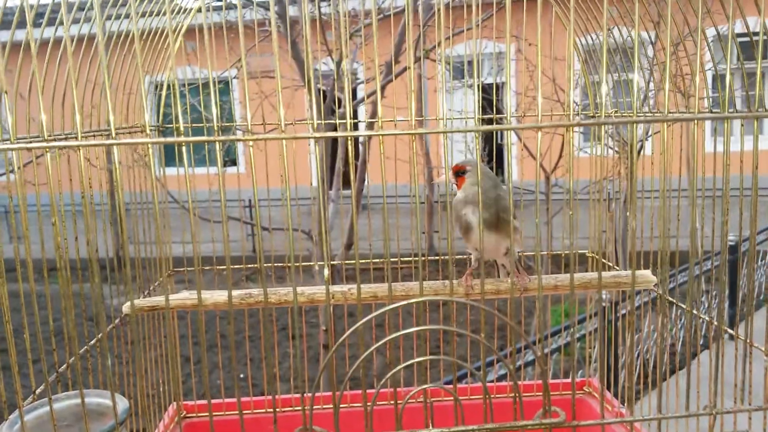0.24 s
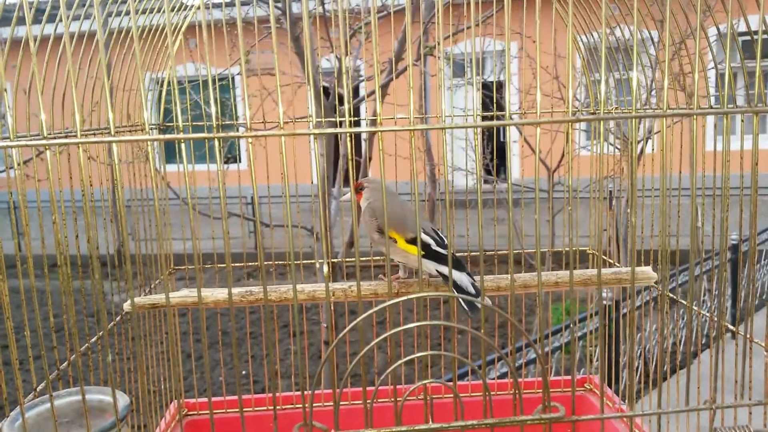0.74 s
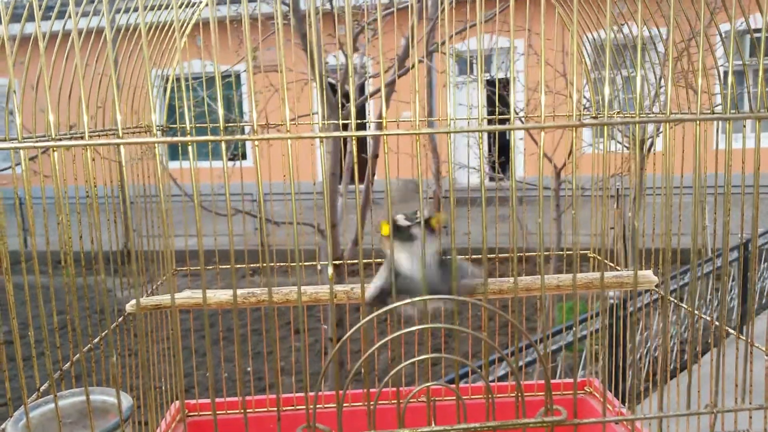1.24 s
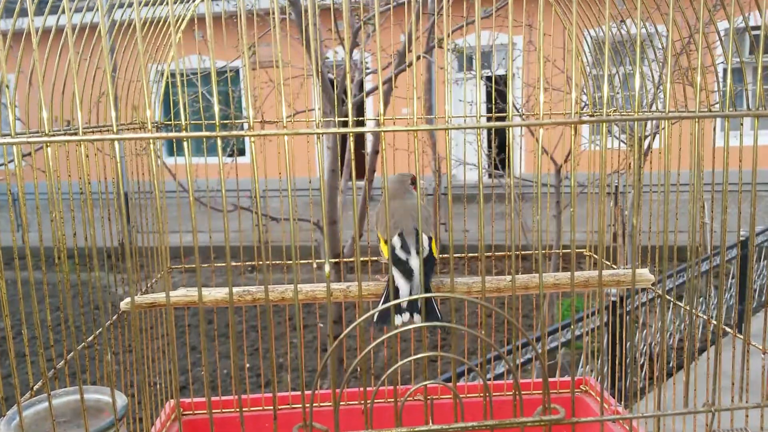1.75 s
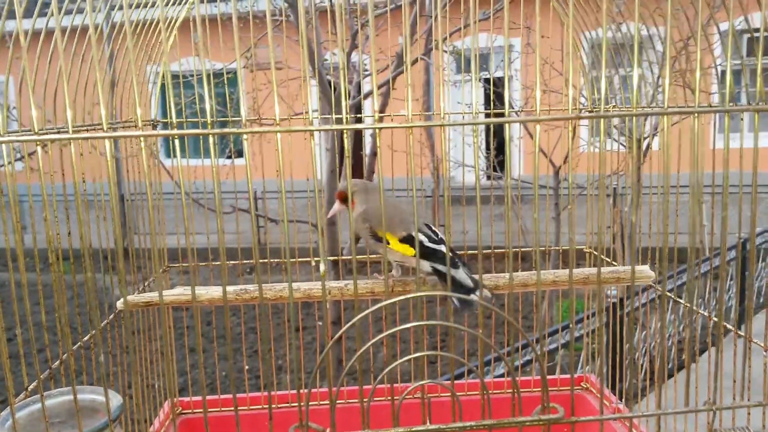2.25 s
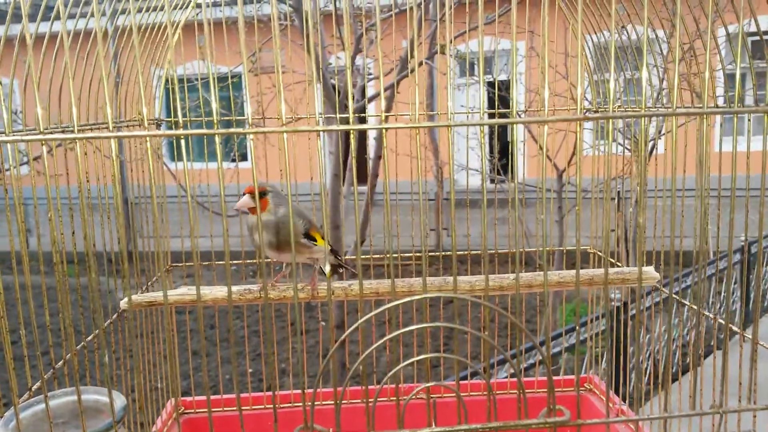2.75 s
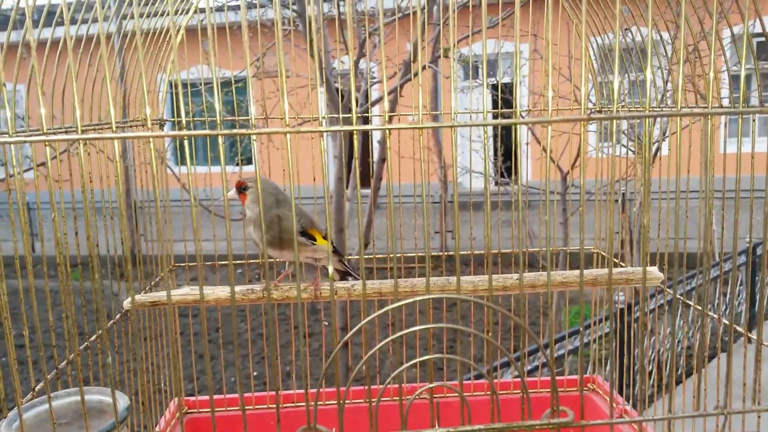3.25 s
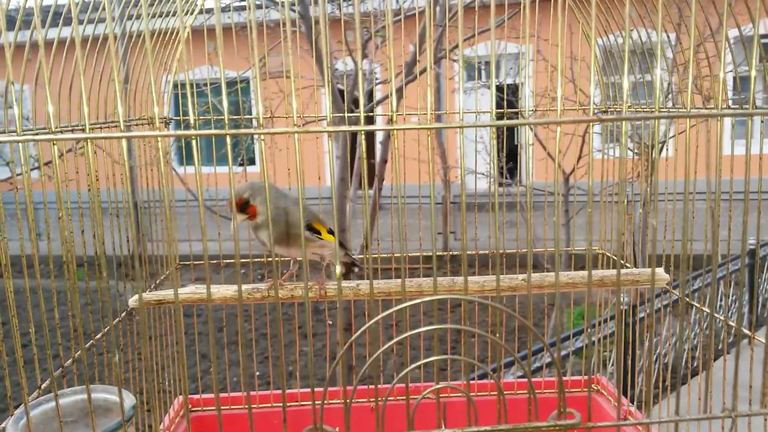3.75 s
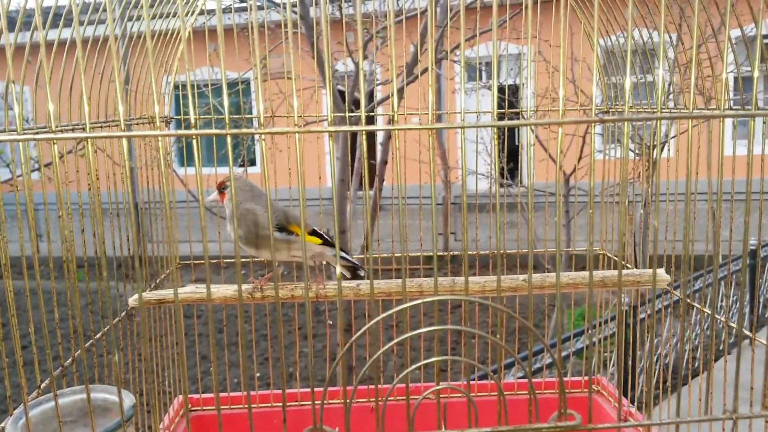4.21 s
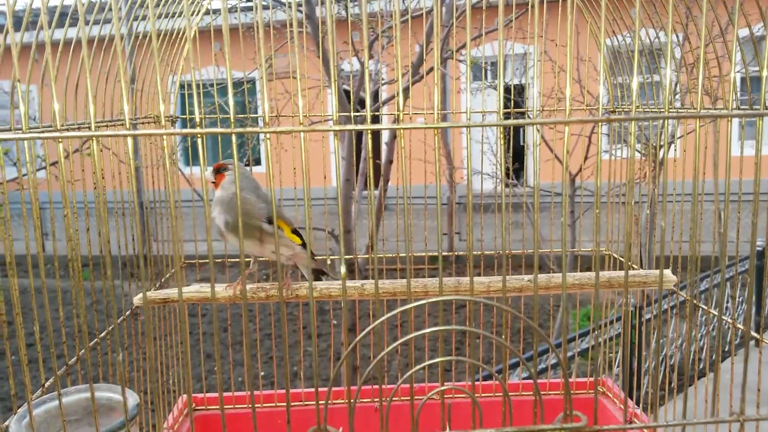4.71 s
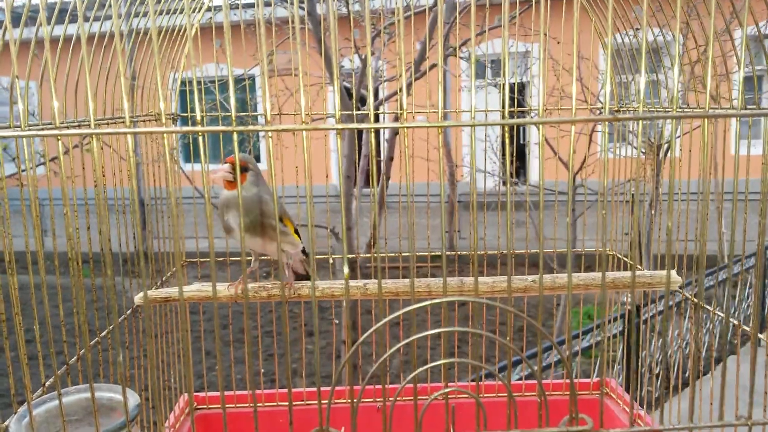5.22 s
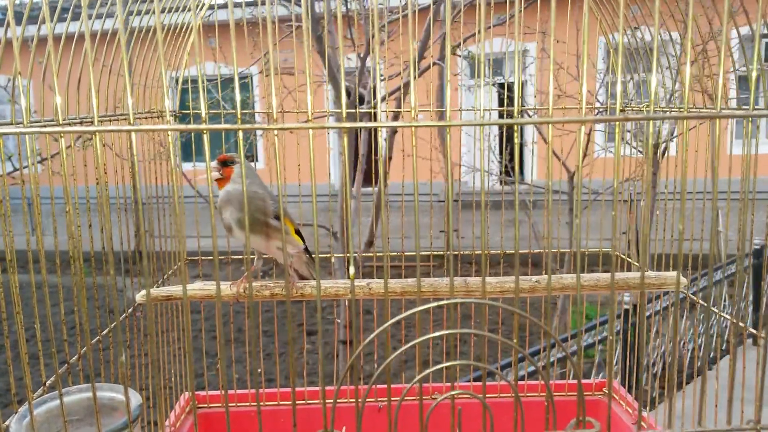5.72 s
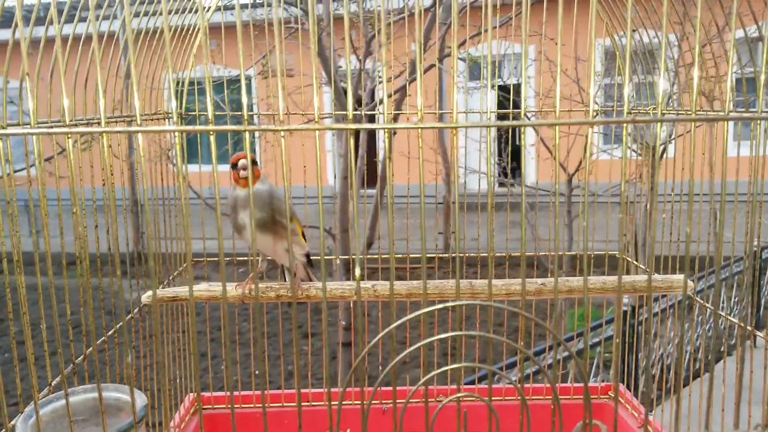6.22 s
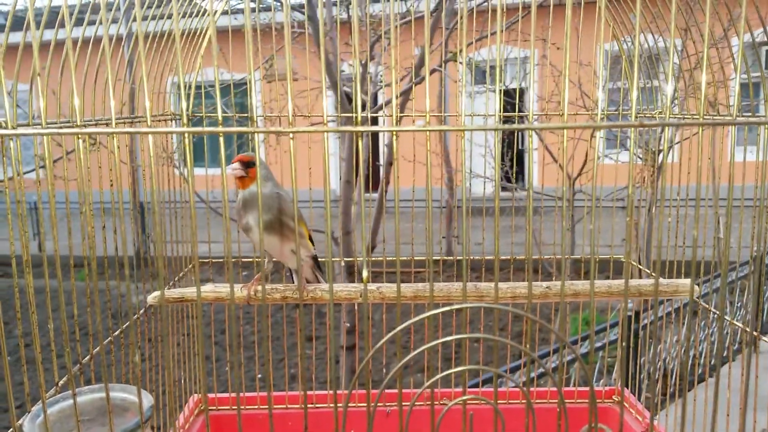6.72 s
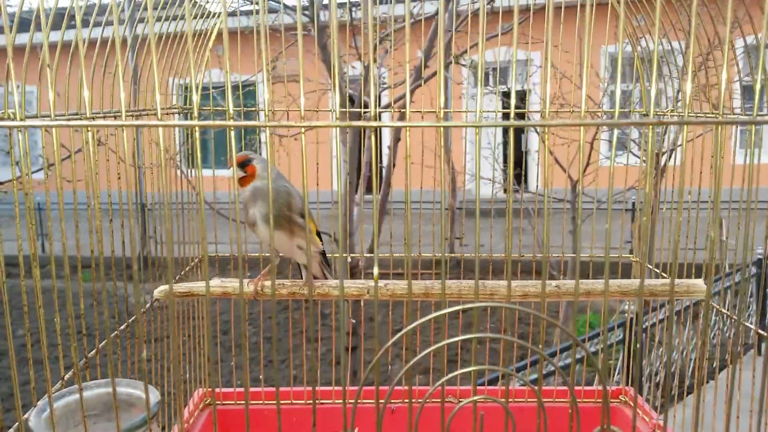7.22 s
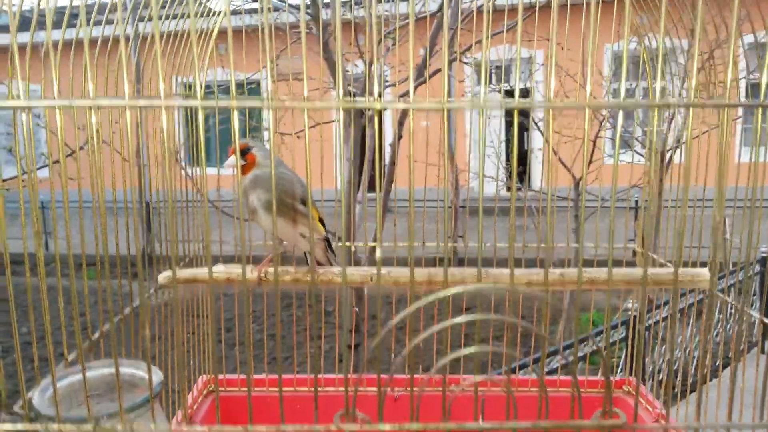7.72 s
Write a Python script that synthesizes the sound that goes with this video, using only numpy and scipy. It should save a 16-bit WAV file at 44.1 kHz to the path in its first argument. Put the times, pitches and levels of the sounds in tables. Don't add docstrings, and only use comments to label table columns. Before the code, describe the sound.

A courtyard outdoors, heard by a close stereo microphone with gentle low wind. At 0-0.9 s wings rustle, a far bird trills, faint knocks sound near 0.2 and 0.6, and brief distant chirps cluster around 0.7-0.8. At 1.25 the near finch starts with a tiny rasp, holds a high whistle near 6 kHz, slides down to 4 kHz by 1.7, then chatters in two quick groups of four, 1.84-2.05. Quiet follows, with faint far trills and soft rustling from 2.1 to 3. Wind bumps at 3.2-3.45; sharp hollow knocks at 3.6 open a hissing spray, steady until 4.5, fading out by 5.6. A soft bump comes at 4.6. From 4.95 to 6.8 the finch sings its busier phrase: clicks, chirps, a strong rise at 5.3, scrape, steep drop, warble, high swell, rolled fall and closing buzz. Then a subdued murmur, wind thumps near 7 and 7.5, and faint taps to about 7.9.

```python
import sys
import numpy as np
from scipy import signal
from scipy.fft import rfft, irfft, next_fast_len
from scipy.io import wavfile
from scipy.ndimage import uniform_filter1d, map_coordinates

SR = 44100
rng = np.random.default_rng(int(sys.argv[2]) if len(sys.argv) > 2 else 0)


def amp(db):
    return 10 ** (np.asarray(db, float) / 20)


def write(x):
    x = np.atleast_2d(x).T
    wavfile.write(sys.argv[1], SR, np.round(np.clip(x, -1, 1) * 32767).astype(np.int16))


N = 351036
TURN = round(3.3 * SR)
NOW = np.arange(N) / SR

# (time [s], pitch [Hz], level [dB])
RASP = [(1.248, 2950, -44.5), (1.26, 3150, -34.5), (1.286, 3547, -33), (1.305, 3600, -34.5),
        (1.32, 3820, -28), (1.328, 4020, -29), (1.336, 4400, -24)]
# (time [s], pitch [Hz], level [dB])
ARCH = [(1.335, 4340, -23), (1.345, 4619, -19.5), (1.357, 5360, -17), (1.38, 5810, -13), (1.4, 6010, -17.5),
        (1.486, 6197, -19), (1.51, 5980, -21)]
# (time [s], pitch [Hz], level [dB])
SLIDE = [(1.508, 5940, -22.5), (1.519, 5820, -12), (1.524, 5730, -8), (1.534, 5450, -16),
         (1.547, 5200, -11), (1.559, 5040, -22.5)]
SLIDE_END = [(1.558, 4950, -17), (1.572, 4980, -15.5), (1.578, 4870, -12.5), (1.585, 4860, -15.5),
             (1.592, 4800, -10.5), (1.611, 4645, -12.5), (1.627, 4450, -20), (1.665, 4175, -21.5),
             (1.687, 4100, -16)]
SLIDE_OUT = [(1.688, 4060, -15), (1.697, 3984, -20.5), (1.733, 3700, -31)]
# (time [s], level [dB])
CHATTER = [(1.837, -17), (1.856, -15), (1.875, -17.5), (1.892, -18.5), (1.972, -20.5), (1.991, -15),
           (2.01, -14.5), (2.029, -18)]
# (time [s], pitch [Hz], level [dB])
OPENER = [(4.95, 2593, -34.5), (4.955, 2770, -26.5), (4.963, 3031, -19.5), (4.969, 3046, -24),
          (4.978, 3095, -38.5)]
# (time [s], pitch [Hz], level [dB])
RISE = [(5.307, 2698, -58.5), (5.323, 3450, -23.5), (5.345, 4150, -13), (5.383, 4520, -18.5),
        (5.408, 4730, -20.5), (5.44, 5054, -0.5), (5.458, 5265, -16), (5.507, 5586, -9.5),
        (5.557, 5893, -12), (5.564, 5980, -27)]
# (time [s], pitch [Hz], level [dB])
SCRAPE = [(5.597, 4330, -36.5), (5.615, 5366, -17), (5.63, 5750, -37.5)]
# (time [s], pitch [Hz], level [dB])
DROP = [(5.653, 10010, -36), (5.662, 8910, -26), (5.678, 7990, -24.5), (5.692, 7590, -6.5),
        (5.7, 7340, -14), (5.716, 7150, -4), (5.725, 6770, -15.5), (5.746, 6590, -10.5),
        (5.753, 6740, -20.5)]
# (time [s], pitch [Hz], level [dB])
WARBLE = [(5.928, 3230, -47.5), (5.938, 4120, -12.5), (5.969, 3774, -21.5), (5.983, 3570, -22.5)]
FADE = [(5.981, 3560, -24), (6.013, 2985, -33), (6.034, 2650, -41), (6.055, 2399, -66)]
# (time [s], pitch [Hz], level [dB])
SWELL = [(6.296, 6950, -42.5), (6.31, 7480, -26), (6.347, 7370, -12), (6.372, 7347, -11.5),
         (6.377, 7330, -27.5)]
# (time [s], pitch [Hz], level [dB])
ROLL = [(6.459, 9640, -37.5), (6.484, 8286, -20), (6.513, 7450, -8), (6.542, 6960, -14), (6.563, 5834, -11)]
ROLL_END = [(6.561, 5750, -10), (6.568, 5620, -11.5), (6.578, 5345, -23.5)]
# (time [s], pitch [Hz], level [dB])
SPLUTTER = [(6.58, 5950, -19.5), (6.588, 4390, -22), (6.594, 3530, -36.5), (6.604, 2797, -52)]
# (time [s], pitch [Hz], level [dB])
BUZZ = [(6.6645, 4050, -30), (6.674, 4000, -16), (6.72, 3880, -19), (6.764, 3720, -23), (6.799, 3520, -28),
        (6.814, 3350, -40)]
# (time [s], pitch [Hz], level [dB])
HOOKS = [
    [(5.155, 8270, -36), (5.16, 8050, -16.5), (5.168, 7900, -11), (5.176, 8100, -23.5), (5.183, 8330, -31)],
    [(5.791, 4366, -31.5), (5.796, 5050, -15), (5.803, 5486, -14), (5.81, 5563, -12), (5.818, 5510, -14),
     (5.826, 5300, -34.5)],
    [(5.841, 4660, -33), (5.845, 5200, -22), (5.849, 5694, -21.5), (5.854, 5413, -30.5)],
    [(5.856, 3344, -36), (5.861, 4397, -16), (5.868, 3870, -21), (5.876, 3440, -31.5)],
    [(6.166, 8220, -39), (6.171, 7960, -28.5), (6.177, 7500, -15.5), (6.189, 7010, -10), (6.201, 6776, -15),
     (6.211, 6765, -17.5), (6.216, 6730, -42.5)],
]
# (time [s], pitch [Hz], level [dB])
TWISTS = [
    [(5.89, 7100, -28), (5.894, 5250, -13), (5.897, 4645, -22.5), (5.9, 5567, -15), (5.904, 6426, -19),
     (5.909, 6640, -30.5)],
    [(6.648, 4374, -31), (6.655, 4620, -16.5), (6.66, 5190, -16), (6.6635, 4685, -28)],
]
# (time [s], length [s], from [Hz], to [Hz], level [dB])
CHIRPS = [(5.035, 0.018, 3070, 4810, -10.5), (5.057, 0.014, 4706, 4875, -6.5),
          (5.208, 0.013, 3710, 4386, -20), (5.223, 0.028, 3556, 5673, -10), (5.248, 0.02, 5815, 5838, -9),
          (6.637, 0.0057, 7610, 7730, -22)]
# (time [s], length [s], from [Hz], to [Hz], level [dB])
FLICKS = [(5.644, 0.0058, 3886, 7834, -8), (5.649, .004, 7930, 9890, -24.5),
          (6.624, .007, 7777, 4395, -14.5), (6.631, 0.0066, 4480, 7640, -11.5)]

# (time [s], pitch [Hz], level [dB])
LOW_RASP = [(1.248, 2607, -41), (1.262, 2840, -48.5), (1.281, 3100, -52), (1.298, 3350, -47),
            (1.316, 3600, -36), (1.326, 3620, -39.5), (1.337, 4010, -32)]
# (time [s], pitch [Hz], level [dB])
LOW_ARCH = [(1.335, 3850, -22), (1.379, 4570, -25), (1.488, 4806, -24.5), (1.512, 4752, -39)]
# (time [s], pitch [Hz], level [dB])
LOW_RISE = [(6.238, 3430, -35.5), (6.252, 3700, -22.5), (6.275, 4053, -30), (6.301, 4526, -11),
            (6.331, 4760, -24.5), (6.374, 4890, -27), (6.38, 4990, -45)]
# (time [s], pitch [Hz], level [dB])
LOW_HOOKS = [
    [(5.155, 6800, -28.5), (5.16, 6300, -21), (5.168, 6100, -27), (5.177, 6150, -20), (5.183, 6250, -30.5)],
    [(5.838, 2282, -53.5), (5.846, 2870, -49.5), (5.856, 2705, -43.5)],
    [(5.915, 6100, -27), (5.918, 5050, -21.5), (5.925, 5050, -17.5), (5.932, 5246, -25.5),
     (5.939, 5115, -35)],
    [(6.01, 6110, -44.5), (6.018, 5825, -34.5), (6.028, 5440, -43), (6.036, 5143, -46.5)],
]
# (time [s], pitch [Hz], level [dB])
LOW_TWISTS = [
    [(5.305, 3258, -50), (5.32, 3500, -30), (5.335, 3800, -27.5), (5.347, 4024, -48)],
    [(5.894, 5590, -32), (5.899, 4536, -23.5), (5.904, 5340, -28), (5.913, 4880, -41)],
]
# (time [s], length [s], from [Hz], to [Hz], level [dB])
LOW_SLURS = [(5.6, .036, 3187, 4400, -28.5), (6.167, 0.049, 6100, 4825, -26.5)]
# (time [s], length [s], from [Hz], to [Hz], level [dB])
LOW_FLICKS = [(6.577, 0.006, 4730, 3050, -24), (6.588, 0.0065, 3830, 2370, -61)]

MIXED = [(1, 1), (2, -1), (1, -1), (-1, 2), (1, 2)]
# (frequency [Hz], width [Hz], share [0-1])
HOLLOWS = [(5050, 150, 0.53), (7100, 77, 0.49)]
# (frequency [Hz], left over right [dB], left lead [rad])
AWAY = [(3450, 0.7, 2.4), (4130, 4.1, 1.0), (4820, 5.1, -0.2), (5510, 12.1, -0.7), (6200, 12.3, -3.9),
        (6890, 0.1, -3.7), (7580, -4.6, -7.0), (11370, 1.4, -13.0), (14300, -9, -14.9)]
# (frequency [Hz], left over right [dB], left lead [rad])
FACING = [(3450, -1.0, -8.2), (4130, 3.3, -9.3), (4820, 2.1, -10.0), (6200, 6.4, -11.9),
          (6890, -1.8, -13.0), (7580, -6.2, -13.2), (8270, -9.8, -13.6), (9400, -1, -13),
          (11370, -1.2, -16.0), (14300, -8, -18.6)]
# (frequency [Hz], gain [dB])
RETURN = [(2000, -23.5), (3000, -6.5), (4000, -11), (5200, -8), (6700, -4), (8200, -4.5), (11000, -8)]
# (frequency [Hz], time to fall 60 dB [s])
WALLS = [(300, 0.11), (4000, 0.73), (7000, 0.58), (12000, 0.011)]

# (start [s], end [s], from [Hz], to [Hz], level [dB])
FAR = [(0.694, 0.701, 3850, 5840, -26), (0.7, 0.714, 5970, 5570, -26.5), (0.718, 0.721, 5700, 3870, -46.5),
       (0.722, 0.753, 2856, 3130, -40.5), (0.761, 0.766, 3380, 4400, -30.5),
       (0.765, 0.778, 4600, 3590, -31), (0.736, .757, 5730, 6300, -40), (0.772, 0.783, 7870, 7000, -42),
       (.782, 0.793, 7100, 7840, -45), (0.806, 0.821, 7870, 7300, -46.5), (.782, 0.794, 3710, 3900, -42.5),
       (0.807, 0.817, 3760, 3650, -33), (0.833, 0.867, 3600, 3880, -57), (1.175, 1.26, 4430, 3960, -49),
       (2.195, 2.215, 4050, 3920, -51.5), (2.305, 2.325, 3800, 3930, -50), (3.046, 3.056, 2490, 3620, -47),
       (3.097, 3.099, 2490, 3840, -40), (3.338, 3.417, 3010, 3090, -55.5),
       (4.626, 4.658, 2885, 4120, -35.5), (0.576, 0.585, 1900, 1950, -40.5), (0.962, 0.982, 740, 744, -36),
       (7.383, 7.401, 6450, 3390, -53), (7.612, 7.65, 3000, 3530, -59), (7.659, 7.686, 3690, 3390, -58),
       (7.701, 7.748, 2220, 2130, -63.5)]
# (start [s], end [s], pitch [Hz], rate [notes/s], level [dB])
FAR_TRILLS = [(0.049, .12, 3450, 29, -48), (.12, .2, 3750, 29, -47), (0.197, .66, 4360, 19.7, -45),
              (2.2, 2.92, 5330, 8.7, -45.5), (2.17, 2.9, 5700, 17.4, -49), (2.38, 2.9, 3950, 26, -58),
              (2.57, 2.75, 4420, 17, -55), (2.3, 2.85, 6700, 20, -54), (7.642, 7.9, 6600, 20, -68)]
# (time [s], peak [dB], thud [dB], attack [ms])
KNOCKS = [(0.219, -26, -13.5, 2.7), (0.6027, -37, -11, 2.3), (3.5869, -22.5, -6.5, .2),
          (3.6195, -33, -13.5, .3), (3.6366, -48, -10.5, 1.3), (3.6543, -24.5, -14, 2),
          (4.594, -14, -29, 7.2), (7.332, -35, -22.5, 1.8), (7.5167, -56, -26, 0.77),
          (7.89, -33, -15.5, 5.77)]
# (frequency [Hz], width [Hz], level [dB])
BOX = [(342, 64, 1.5), (680, 29, -5), (1820, 770, -13.5)]

# (time [s], level [dB])
FLOW = [
    (3.586, -96),
    (3.59, -34),
    (4, -34),
    (4.5, -38),
    (5, -36),
    (5.2, -43.5),
    (5.5, -55),
    (5.6, -87),
]
# (frequency [Hz], density [dB/Hz])
SPRAY = [(1500, -33.5), (2500, -23), (3200, -9.5), (5400, -9.5), (6700, 2.5), (8200, -11.5), (11000, -18),
         (15000, -35)]
# (time [s], time to fall 60 dB [s], level [dB])
WINGS = [(0, .36, -41), (.23, .25, -47), (.665, .6, -45), (.7, .5, -43)]
# (time [s], time to fall 60 dB [s], level [dB])
FAR_WINGS = [(2.1, 2, -45), (2.91, 1.1, -43)]
# (frequency [Hz], density [dB/Hz])
DULL = [(1500, -48), (3000, -23.5), (4500, -4), (6000, -2.5), (7200, -12.5), (8500, -14), (12000, -37)]
# (frequency [Hz], density [dB/Hz])
MURMUR = [(88, -29), (150, -8.5), (290, -4.5), (1100, -3.5), (1900, -8.5), (4000, -16.5), (5200, -25),
          (8800, -120)]
# (frequency [Hz], density [dB/Hz])
RUMBLE = [(12, -45), (20, -7), (97, -2.5), (265, -12.5), (300, -14), (390, -30.5), (660, -120)]
# (time [s], half length [s], level over the breeze [dB])
GUSTS = [(0.24, 0.032, 11), (3.21, 0.019, 10.5), (3.342, 0.02, 12), (3.452, 0.042, 5), (6.103, 0.063, 5.5),
         (6.233, 0.063, 10.5), (7.741, 0.019, 4.5), (6.987, 0.023, 15.5), (7.512, 0.079, 17.5)]
# (time [s], gain [dB])
GAIN = [(0, 2.5), (1.75, -1), (1.95, -8.5), (2.9, -9.5), (3.1, -3), (5.1, -1.5), (5.5, -10), (5.8, -10.5),
        (7.3, -13), (7.75, -4.5)]
# (time [s], half length [s], change [dB], share of it in the wind [0-1])
STARVED = [(1.375, 0.036, -15.5, .7), (1.488, 0.18, -2.5, .1), (1.887, .015, -18, .6),
           (2.007, 0.037, -30, 1.1), (5.75, .04, -2.5, .2), (5.946, 0.03, -4, .9), (6.191, .02, -22, .1),
           (6.333, 0.043, -16, .3), (6.686, 0.06, -22.5, .1)]


def finch():
    upper, lower = repertoire()
    fa, a, over_a = membrane(upper, arch_hz=(4000, 7250), arch_db=6, top_db=-40)
    fb, b, over_b = membrane(lower, arch_hz=(3200, 5100), arch_db=0, top_db=-12)
    ragged = amp(3.0 * wobble(700))

    def tone(hz):
        return np.sin(2 * np.pi * np.cumsum(hz) / SR) * (hz < .4 * SR)

    def high(hz):
        lift_db = 14 * np.exp(-((hz - 6800) / 850) ** 2)
        top_loss_db = -.9 * np.maximum(hz - 8500, 0) / 1000
        return ragged * tone(hz) * amp(top_loss_db + lift_db)

    song = a * tone(fa) + b * tone(fb)
    for order, db in enumerate([0, -12, -22], 2):
        song += amp(db) * (a * over_a * high(order * fa) + b * over_b * high(order * fb))
        over_a, over_b = np.minimum([over_a, over_b], amp(-5))

    apart_db = -37 * np.maximum(fa - fb - 1500, 0) / 1000
    coupling_db = -21 * (np.abs(NOW - 1.95) < .15) - 4 * (np.arange(N) > TURN)
    for (m, k), db in zip(MIXED, [-19.0, -22, -47.0, -41.5, -43.0]):
        mixed_db = db + coupling_db + (m == 2) * apart_db
        song += amp(mixed_db) * np.sqrt(a * b) * high(m * fa + k * fb)

    breath = filtered(rng.standard_normal(N), lambda hz: amp(along(SPRAY, hz)))
    hiss = np.diff(rng.standard_normal(N + 3), n=3)
    leak_db = 13 * (np.abs(NOW - 1.29) < .045)
    air = amp(-46.5 + leak_db) * unit(breath) + amp(-42.5 + .5 * coupling_db) * unit(hiss)

    def throat(f):
        return np.prod([1 - share * resonance(f, c, w) for c, w, share in HOLLOWS], axis=0)

    return filtered(song, throat) + (a + b) * air


def membrane(notes, arch_hz, arch_db, top_db):
    hz, size, overtone = np.zeros((3, N))
    hoarse = wobble(900)
    for (over_db, rate, depth), rows in notes:
        s, pitch, db = np.transpose(rows)
        n = np.arange(round(s[0] * SR), round(s[-1] * SR))
        t = n / SR
        glide = np.interp(t, s, pitch)
        slowing = 1 - .4 * (rate < 120) * (t - s[0])
        turn = 2 * np.pi * rate * slowing * (t - s[0])
        trill = np.sin(turn) + .2 * (120 < rate < 200) * np.sin(2 * turn)
        trill += (0.17 + 0.85 * (rate > 500)) * hoarse[n]
        swing_depth = .4 * (rate > 0) + .35 * (200 < rate < 500)
        swing = swing_depth * np.sign(5000 - glide) * trill
        hz[n] = np.maximum(glide + depth * trill, 0.8 * glide)
        size[n] = np.sqrt(2) * amp(np.interp(t, s, db)) * np.abs(1 + swing)
        overtone[n] = amp(over_db - 30 - 2 * (glide / 1000 - 5.5))
    voiced = np.flatnonzero(hz)
    hz = np.interp(np.arange(N), voiced, hz[voiced])
    overtone = np.interp(np.arange(N), voiced, overtone[voiced])
    size = np.abs(uniform_filter1d(uniform_filter1d(size, size=40), size=40))
    overtone = np.abs(uniform_filter1d(overtone, size=160))

    u = np.linspace(0, 1, round(0.017 * SR))
    scatter, flutter = wobble(1200), wobble(1900)
    for s, db in CHATTER:
        n = round(s * SR) + np.arange(len(u))
        arch = np.sin(np.pi * u ** 1.2)
        hz[n] = arch_hz[0] + (arch_hz[1] - arch_hz[0]) * arch + 400 * scatter[n]
        middle_db = -2.7 * ((hz[n] - 6000) / 1000) ** 2
        size[n] = amp(db + arch_db + 4.8 * flutter[n] - 7.4 * u + middle_db) * np.sin(np.pi * u) ** .7
        overtone[n] = amp(top_db)
    return hz * (1 + 0.0022 * wobble(300)), size * amp(.6 * wobble(200)), overtone


def repertoire():
    settle, creep = 0.17, 0.12
    ease_share = 0.93

    def leap(u):
        return (1 - creep) * (1 - np.exp(-u / settle)) + creep * u

    def ease(u):
        return (1 - np.exp(-u / ease_share)) / (1 - np.exp(-1 / ease_share))

    def even(u):
        return u

    clear = [ARCH, SLIDE, SLIDE_END, SLIDE_OUT, RISE, DROP, SWELL, FADE, ROLL_END] + HOOKS
    clear += short_notes(CHIRPS, leap) + short_notes(FLICKS, even)
    upper = [((0, 0, 0), rows) for rows in clear]
    upper += [((26, 0, 200), RASP), ((0, 235, 450), ROLL), ((19.5, 0, 0), OPENER)]
    upper += [((-12, 0, 0), rows) for rows in TWISTS]
    upper += [((-12, 108, 300), WARBLE), ((0, 139, 260), BUZZ)]
    upper += [((0, 900, 700), SCRAPE), ((0, 900, 700), SPLUTTER)]
    low = [LOW_ARCH, LOW_RISE] + LOW_HOOKS + LOW_TWISTS
    low += short_notes(LOW_SLURS, ease) + short_notes(LOW_FLICKS, even)
    lower = [((9.5, 0, 0), rows) for rows in low]
    lower += [((35.5, 0, 200), LOW_RASP)]
    return upper, lower


def short_notes(rows, path):
    attack_s, release_s = 0.00071, 0.001
    u = np.linspace(0, 1, num=40)

    def fade_db(u, long, s):
        return 23.5 * np.exp(-u / min(s / long, 0.16))

    notes = []
    for s, long, from_hz, to_hz, db in rows:
        level = db - fade_db(u, long, attack_s) - fade_db(1 - u, long, release_s)
        notes.append(np.transpose([s + u * long, from_hz + (to_hz - from_hz) * path(u), level]))
    return notes


def at_ports(song, way):
    side = np.array([[.5], [-.5]])
    return filtered(song, lambda hz: amp(side * along(way, hz)) * np.exp(1j * side * along(way, hz, axis=2)))


def echo(x, stretch):
    hz, t, z = signal.stft(rng.standard_normal((2, SR)), SR, nperseg=256)
    decay_db = -60 * t / (stretch * along(WALLS, hz)[:, None])
    tail = signal.istft(z * amp(decay_db), SR, nperseg=256)[1]
    delayed = np.pad(x, (300, 0))[None]
    return signal.fftconvolve(delayed, tail / np.linalg.norm(tail[0]), axes=1)[:, :N]


def knocks():
    rattle, thud = np.zeros((2, N + SR))
    t = np.arange(SR // 10) / SR
    for s, db, thud_db, ms in KNOCKS:
        burst = rng.standard_normal((2, len(t))) * (1 - np.exp(-1000 * t / ms))
        here = slice(round(s * SR), round(s * SR) + len(t))
        rattle[here] += amp(db + 4 - 60 * t / .045) * burst[0]
        thud[here] += amp(db + thud_db + 24.5 - 60 * t / 0.105) * burst[1]

    def box(f):
        return sum((-1) ** k * amp(db) * resonance(f, c, w) for k, (c, w, db) in enumerate(BOX))

    bright = filtered(rattle[:N], lambda f: resonance(f, 6700, 4000) ** 2)
    contact = bright + filtered(thud[:N], box)
    return filtered(contact, lambda hz: late(hz, ms=0.63)) + amp(-8.5) * echo(contact, stretch=1.0)


def far_birds():
    calls = [(call, 0, -8) for call in FAR]
    for start, end, hz, rate, db in FAR_TRILLS:
        fall = .02 + .0025 * rate
        for s in np.arange(start, end - .5 / rate, 1 / rate):
            chance = rng.standard_normal(2)
            pitch = hz * (1 + .012 * chance[0])
            note = (s, s + 0.61 / rate, pitch * (1 + fall / 2), pitch * (1 - fall / 2), db)
            calls.append((note, 1.5 * chance[1], -2))
    direct, wet = np.zeros((2, N))
    waver = 1 + .018 * wobble(700)
    for (start, end, from_hz, to_hz, db), vary_db, wet_db in calls:
        u = np.linspace(0, 1, round((end - start) * SR))
        here = slice(round(start * SR), round(start * SR) + len(u))
        phase = 2 * np.pi * np.cumsum((from_hz + (to_hz - from_hz) * u) * waver[here]) / SR
        call = amp(db + vary_db) * np.sin(np.pi * u) ** .5 * np.sin(phase)
        direct[here] += call
        wet[here] += amp(wet_db) * call
    return filtered(direct, lambda hz: late(hz, ms=.55) * amp([[2.5], [-2.5]])) + echo(wet, stretch=1.1)


def background():
    dropout_db = sum(db * np.exp(-((NOW - s) / half) ** 4) * [[1], [share]] for s, half, db, share in STARVED)
    starve, lull = amp(dropout_db)
    flow = curve(FLOW)
    gust_db = sum(db * np.exp(-((NOW - s) / half) ** 2) for s, half, db in GUSTS)
    lumps = amp(1.3 * np.array([wobble(4.7), wobble(9.0)]) - [[3], [-3]])
    wind = amp(-53 + gust_db) * unit(lumps * rush(RUMBLE, .55, patchy_db=1.5))
    yard_level = amp(-50.5) + amp(-6.5) * flow
    yard = yard_level * amp(.7 * wobble(3)) * rush(MURMUR, .75, patchy_db=3)
    fizz = amp(1.1 * wobble(14)) * rush(SPRAY, .8, patchy_db=.8)
    leaves_and_spray = (amp(-57.5) * starve + flow) * fizz
    wings = rustle(WINGS) * fizz + rustle(FAR_WINGS) * rush(DULL, 0.2, patchy_db=5.5)
    return curve(GAIN) * (lull * wind + starve * yard + leaves_and_spray) + wings


def rustle(rows):
    return sum(amp(db - 60 * np.abs(NOW - s) / t60) * np.clip(1 + (NOW - s) / 0.08, 0, 1) ** 4
               for s, t60, db in rows)


def rush(spectrum, alike, patchy_db):
    z = signal.stft(rng.standard_normal((2, N)), nperseg=512)[2]
    patches = uniform_filter1d(uniform_filter1d(rng.standard_normal(z.shape[1:]), 6, 0), 14, 1)
    a, b = signal.istft(z * amp(patchy_db * unit(patches)), nperseg=512)[1][:, :N]

    def spread(hz):
        angle = np.arccos(np.clip(alike, -1, 1) / (1 + (hz / 6940) ** 8)) / 2
        share = np.array([np.cos(angle) * [[1], [1]], np.sin(angle) * [[1], [-1]]])
        return share * amp(along(spectrum, hz)) * late(hz, ms=0.384)

    return unit(filtered(np.array([[a], [b]]), spread).sum(axis=0))


def late(hz, ms):
    return np.exp(-1j * np.pi * hz * ms / 1000 * np.array([[1], [-1]]))


def resonance(f, centre, width):
    return 1j * f * width / (centre * centre - f * f + 1j * f * width)


def filtered(x, response):
    m = next_fast_len(N + SR // 2)
    return irfft(rfft(x, m) * response(np.fft.rfftfreq(m, 1 / SR)), m)[..., :N]


def wobble(rate):
    return map_coordinates(rng.standard_normal(int(N * rate / SR) + 4), [np.arange(N) * rate / SR])


def curve(rows):
    return amp(np.interp(NOW, *np.transpose(rows)))


def along(points, hz, axis=1):
    p = np.transpose(points)
    return np.interp(np.log(hz + 1), np.log(p[0] + 1), p[axis])


def unit(x):
    return x / np.sqrt(np.mean(x ** 2) + 1e-20)


def scene():
    song = finch()
    near = np.hstack([at_ports(song, AWAY)[:, :TURN], at_ports(song, FACING)[:, TURN:]])
    off_walls = echo(filtered(song, lambda hz: amp(along(RETURN, hz))), stretch=0.78)
    return amp(1.34) * near + amp(-12.5) * off_walls + far_birds() + knocks() + background()


def roll_off(x):
    return signal.sosfilt(signal.butter(12, 14800, fs=SR, output="sos"), x)


def record(dry):
    rectified = filtered(dry ** 2, lambda hz: (hz > 150) * (hz < 1500) * (hz / 300) ** .5)
    bent = dry + amp(-34.5) * rectified
    bent = filtered(bent, lambda hz: hz / (hz + 12))
    rounded = bent / (1 + np.abs(bent / 1.05) ** 6) ** (1 / 6)
    return roll_off(rounded)


dry = scene()
out = record(dry)
write(out)
```